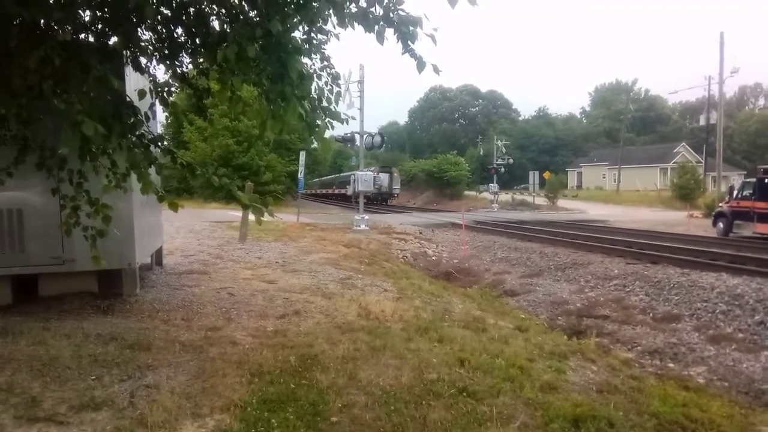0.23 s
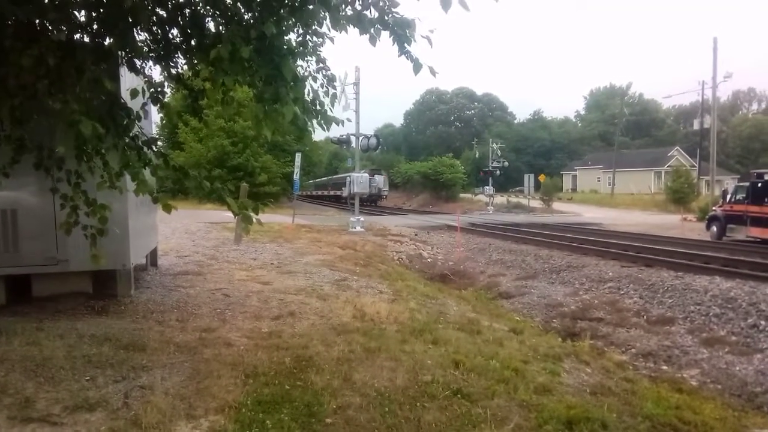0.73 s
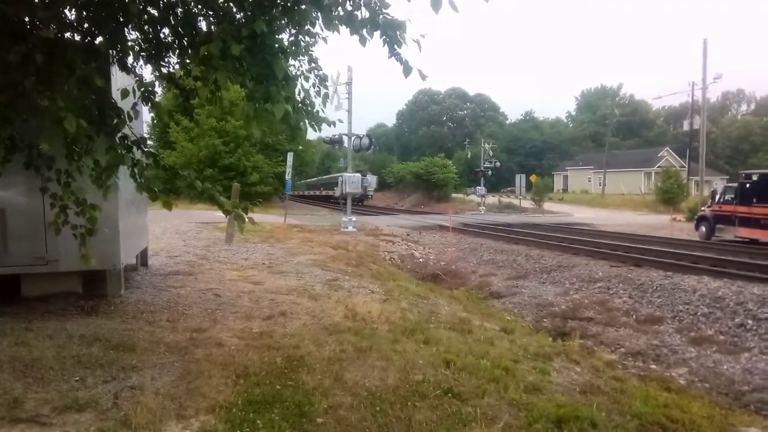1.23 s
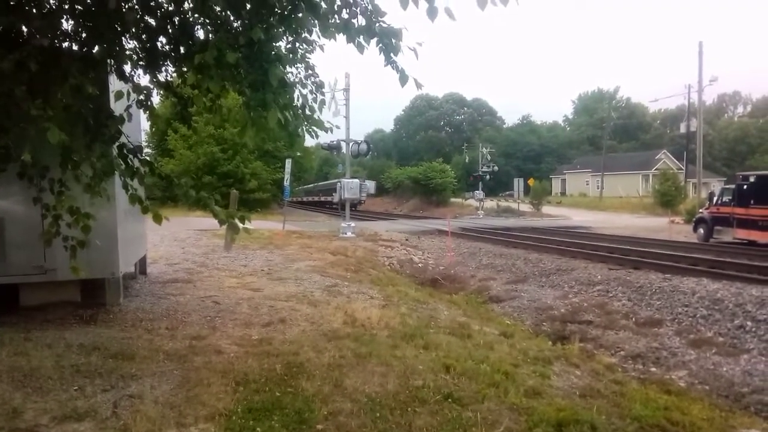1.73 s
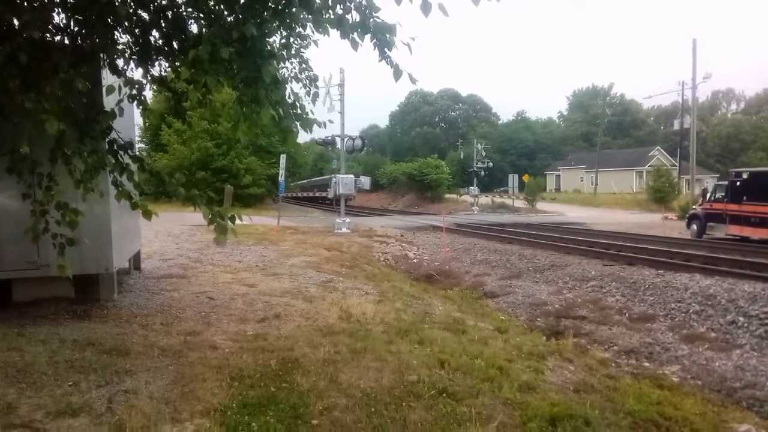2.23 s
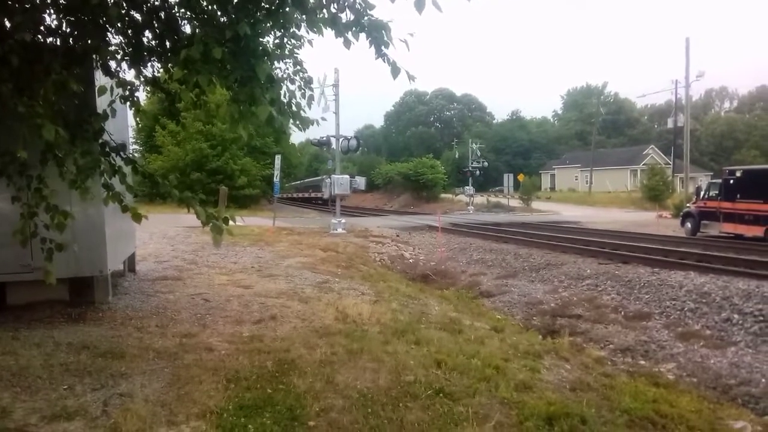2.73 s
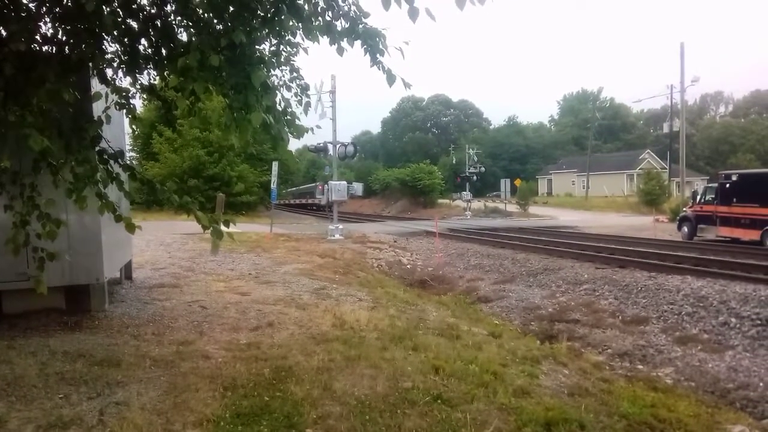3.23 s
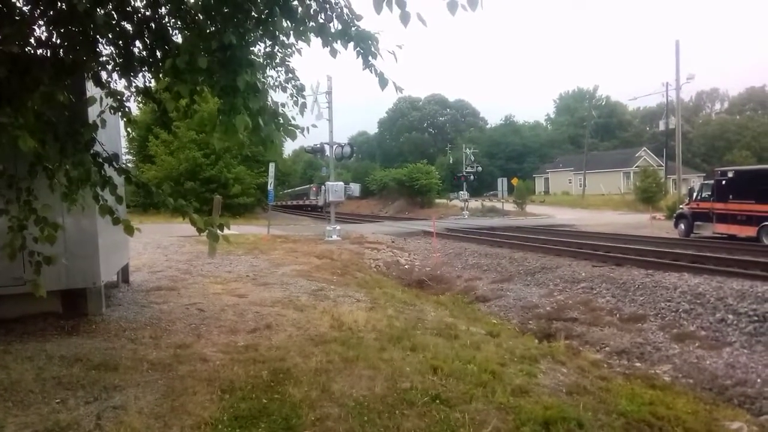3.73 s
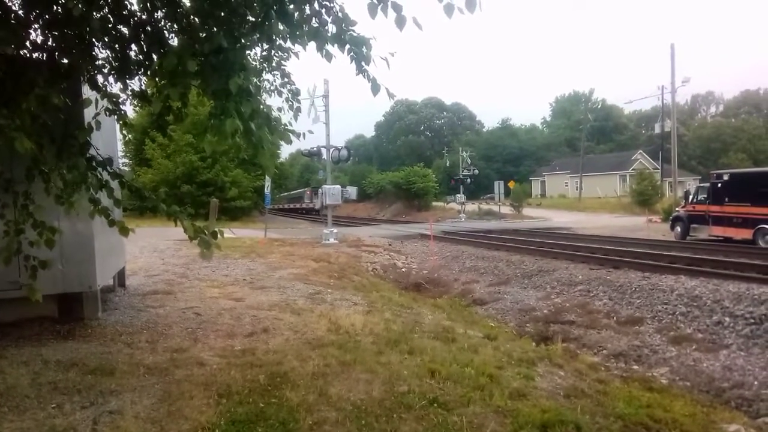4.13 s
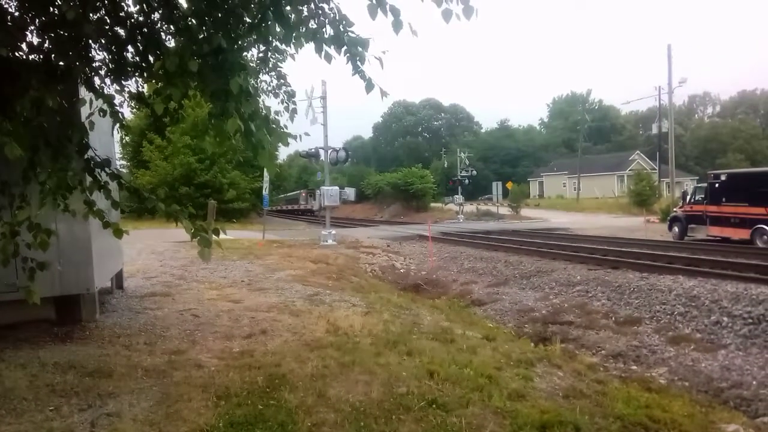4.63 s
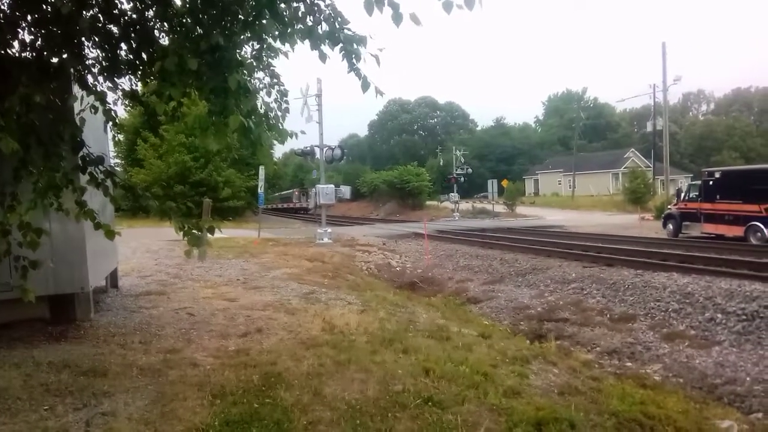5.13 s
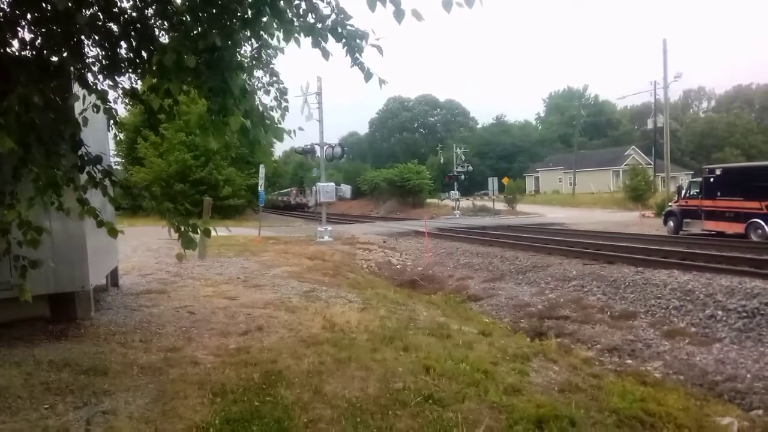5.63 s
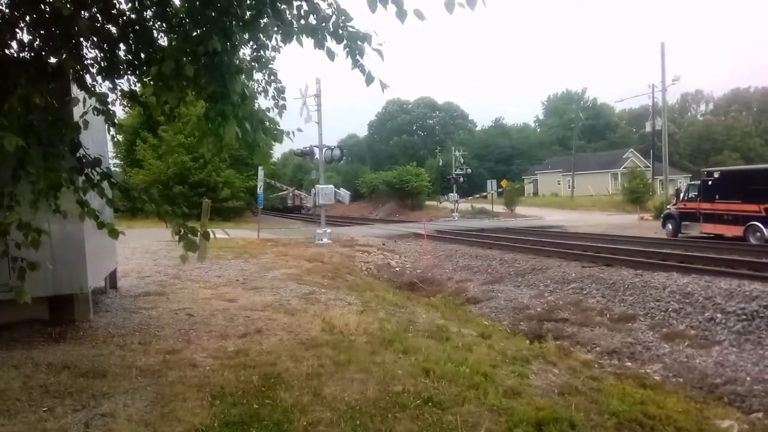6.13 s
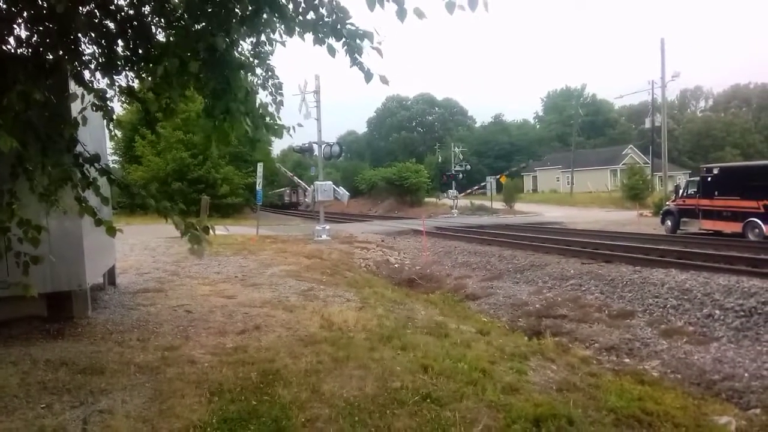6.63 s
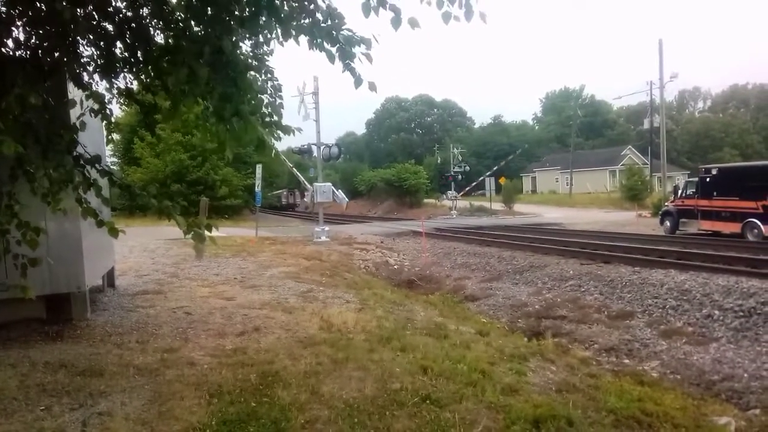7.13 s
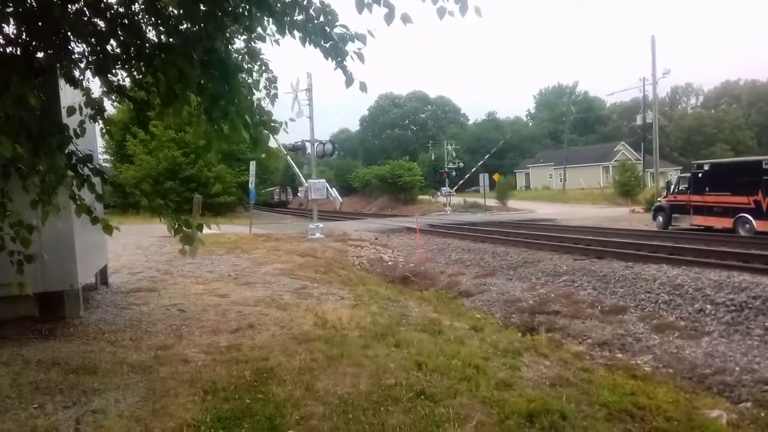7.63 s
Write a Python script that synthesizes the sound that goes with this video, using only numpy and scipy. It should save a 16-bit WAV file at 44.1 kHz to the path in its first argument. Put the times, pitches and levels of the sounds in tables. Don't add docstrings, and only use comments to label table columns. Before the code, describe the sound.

Open air beside a level crossing, mono, with slightly muffled treble. A low train and road rumble is strongest at the start and fades over the first few seconds, with a soft throbbing diesel idle and a faint rail whine. A prominent songbird whistles upward from about 2 to 3.2 kHz for some 0.15 seconds, ending in a tight snap that splits up and down, with a quick wall echo and leafy tail. Snaps fall near 0.3, 2.0, 3.5, 4.6 and 6.1 seconds. A sharp twig tick comes at 1.3, with softer ones later. From 5.2 to 5.45 loose metal clanks and rattles in rapid knocks. A faint high pip sounds at 5.9 and a thin level pipe at 6.4 to 6.8. The idle drops near 6.0; from 6.4 a truck pulls away, its tone rising until 7.7 amid swelling road hiss, then easing. A quick, loud chirp starts at 7.86.

```python
import sys
import numpy as np
from scipy import signal
from scipy.fft import rfft, irfft
from scipy.io import wavfile
from scipy.ndimage import uniform_filter1d

SR = 44100
rng = np.random.default_rng(int(sys.argv[2]) if len(sys.argv) > 2 else 0)


def rack_gain(trim_db):
    fader = np.asarray(trim_db, float)
    return 10 ** (fader / 20)


def digitize_waveform(pressure):
    field = np.atleast_2d(pressure).T
    bounded = np.clip(field, -1, 1)
    quanta = np.round(bounded * 32767).astype(np.int16)
    wavfile.write(sys.argv[1], SR, quanta)


N = 347508
T = np.arange(N) / SR

# frequency in Hz, density in dB per Hz.
AIR_COLOUR = [(48, -13), (62, -0.5), (300, -6.5), (500, -15.5), (830, -10.5), (1300, -18.5), (4800, -22.5),
              (7800, -41.5)]
# train at the start in dB, truck passing in dB.
TRAFFIC_SWELLS = [(.5, 3), (.8, 0.5), (3.8, 5.5)]
# multiple of the engine cycle, level in dB.
IDLE_HUM = [(8, -67.5), (9, -51), (10, -61), (11, -52), (13, -58.5), (14, -57), (15, -56.5), (20, -57.5),
            (23, -56), (36, -63.5)]
# time in seconds, main exhaust tone in Hz, level in dB.
TRUCK_PULL = [
    (6.4, 80, -60),
    (6.598, 99.47, -48),
    (6.75, 119.8, -44),
    (6.92, 160.9, -37.5),
    (7.05, 176, -44),
    (7.22, 187.1, -43.5),
    (7.45, 187.8, -42.5),
    (7.66, 188.2, -41.5),
    (7.88, 177.7, -46.5),
]
# multiple of the main exhaust tone, level in dB.
EXHAUST_ORDERS = [(1 / 3, -8), (2 / 3, -7), (5 / 6, -11.5), (1, -1), (4 / 3, -15)]
# time in seconds, level in dB, latch ring in dB, housing thud in dB,
# pitch of the latch part struck in Hz.
BARRIER_CLANKS = [
    (5.172, -29.5, -4, -22.5, 3300),
    (5.2044, -34.5, -3, -14, 2500),
    (5.2405, -38.5, 0.5, -17, 1800),
    (5.2674, -36, -5.5, -28.5, 2500),
    (5.330, -27.5, -8, -21, 1600),
    (5.3564, -35.5, -12, 1, 1600),
    (5.367, -30, -4, -1, 6450),
    (5.4355, -37, -5, -8, 6450),
    (5.4464, -35, -6.5, -4.5, 6450),
]
# frequency in Hz, level in dB, 60 dB decay in seconds.
LATCH_MODES = [(1597, -4, 0.05), (1800, 4.5, 0.047), (2500, -2.5, 0.13), (3300, 2.5, 0.024),
               (4300, -8, 0.038), (6450, -9.5, 0.11)]
HOUSING_MODES = [(653, 0, .12), (732, 0, 0.25), (824, 4, 0.098), (960, 3, 0.047)]
# time in seconds, level in dB, pitch in Hz, width in seconds.
TWIG_TICKS = [
    (1.3203, -24.5, 5680, 0.00045),
    (1.5175, -42, 5950, .0008),
    (3.70, -49, 7105, .001),
    (6.635, -44, 6660, .001),
    (6.8405, -41, 6450, 0.00065),
]
# time in seconds, pitch in Hz, level in dB.
PIPED_NOTES = [
    [(5.862, 6400, -65.5), (5.875, 6570, -46), (5.91, 6540, -57), (5.94, 6900, -57), (5.965, 6800, -73)],
    [(6.35, 4160, -61), (6.4, 4190, -52.5), (6.8, 4203, -55.5), (6.83, 4300, -62)],
]
# time in seconds, pitch in Hz, level in dB.
NEXT_CHIRP = [
    (7.861, 2500, -53),
    (7.867, 2960, -34),
    (7.871, 2340, -31.5),
    (7.876, 2840, -35.5),
    (7.881, 3160, -17.5),
]
# time of the snap in seconds, level in dB, top pitch in Hz, climb in Hz per ms,
# time before the snap where the climb levels off in seconds.
CALLS = [
    (.321, -24, 3251, 7.3, .026),
    (1.993, -24, 3259, 6.84, .032),
    (3.506, -20, 3096, 7.2, .05),
    (4.586, -22.5, 3197, 5.3, .016),
    (6.090, -23, 3217, 6.9, .02),
]
# time from the snap in seconds, pitch in Hz, level in dB.
SNAP_FLICK = [
    (.001, 3200, -10),
    (.003, 3730, 0.5),
    (.006, 4350, 1),
    (.009, 4546, -6),
    (.015, 4580, -21),
]
# time from the snap in seconds, pitch in Hz, level in dB.
SNAP_FALL = [
    (.004, 3170, -20),
    (.010, 3050, -4),
    (.022, 2800, -2),
    (.032, 2350, -4.5),
    (.040, 1960, -17),
    (.043, 1800, -39.5),
]
# delay in seconds, level in dB.
FAR_WALLS = [
    (0.0176, -14.5),
    (0.0273, -20),
    (.105, -35),
    (.192, -34.5),
    (.33, -33.5),
    (.486, -27.5),
]

AIR_DB, TRAIN_FADE_S, DRIFT_DB = -42, 1.84, 0.45
TRUCK_NEAREST_S, TRUCK_SPREAD_S = 7.4, 0.47
IDLE_HZ = 7.27
IDLE_ENDS_S, IDLE_DROP_DB = 6.02, -11
GEARS_DB, GEARS_LEAD_S = -53.5, 0.073
CARS_HZ, CARS_DB, CARS_DRIFT = 168.8, -56.5, .05
WHINE_HZ, WHINE_DB, WHINE_CLEAREST_S, WHINE_DB_PER_S = 1569, -57.5, 3.22, -1
STRUCK_DB_PER_OCTAVE = -5.5

RISE_S, SCOOP_HZ, SCOOP_S, SCOOP_BEND, SHOULDER_S, LOWEST_HZ = .15, 740, .022, 3.2, .01, 1850
SWELL_S, RAGGED_DB, WAVER_HZ = .037, 4, 5
EASY_HZ, BUZZ_FROM_HZ = 3180, 3050
VOICES_SUM_HZ = 7330
# value at the easy pitch, change per 100 Hz of top above it.
FADE_DB, SNAP_DB, BUZZ_DB, OVERTONE_DB, FALL_STRETCH = (0.9, 2), (2, 1.5), (-18, 6.5), (-26, 4.5), (0.95, -.03)

WALL_MS, WALL_DB, WALL_KNEE_HZ, WALL_LOSS_DB = 9.36, -1, 3060, -8
LEAVES_DB, LEAVES_T60_S, FIELD_DB, FIELD_T60_S = -5, 0.21, -16, 1.2
DUCK_TOP_DB, DUCK_RATIO, DUCK_S = -29, 3, .03


def band(x, hz, width):
    return signal.sosfilt(signal.butter(2, [hz - width / 2, hz + width / 2], "band", fs=SR, output="sos"), x)


def unit(x):
    return x / np.sqrt(np.mean(x ** 2))


def walk(rate):
    hold = int(SR / rate)
    steps = np.repeat(rng.standard_normal(N // hold + 1), hold)
    return unit(uniform_filter1d(uniform_filter1d(steps, hold), hold)[:N])


def cycle(hz):
    return 2 * np.pi * np.cumsum(hz) / SR


def tone(table, t=T, overtone_db=-56.5):
    s, hz, db = np.transpose(table)
    phase = cycle(np.interp(t, s, hz))
    edge = np.clip(np.minimum(t - s[0], s[-1] - t) / 0.00055, 0, 1)
    level = np.sqrt(2) * edge * rack_gain(np.interp(t, s, db))
    return level * (np.sin(phase) + rack_gain(overtone_db) * np.sin(2 * phase))


def ring(modes, size=8000):
    t = T[:size]
    return sum(rack_gain(db) * np.sin(2 * np.pi * hz * t) * rack_gain(-60 * t / t60) for hz, db, t60 in modes)


def add(out, sound, s):
    i = int(s * SR)
    out[i:i + len(sound)] += sound[:N - i]


def passing(lead_s=0):
    return np.exp(-.5 * ((T + lead_s - TRUCK_NEAREST_S) / TRUCK_SPREAD_S) ** 2)


def background():
    f = np.fft.rfftfreq(N, 1 / SR) + 1
    hz, db = np.transpose(AIR_COLOUR)
    colour = rfft(rng.standard_normal(N)) * rack_gain(np.interp(np.log(f), np.log(hz), db))
    colour /= np.sqrt(np.mean(irfft(colour, N) ** 2))
    train = np.exp(-T / TRAIN_FADE_S) - .3
    swells = np.array([train_db * train + truck_db * passing() + DRIFT_DB * walk(1.48)
                       for train_db, truck_db in TRAFFIC_SWELLS])
    out = 0
    for octave in np.arange(4, 14.1, .5):
        share = np.cos(np.pi * np.clip(np.log2(f) - octave, -.5, .5)) ** 2
        place = np.interp(octave, np.log2([200, 800, 2000]), [0, 1, 2])
        swell = np.clip(1 - abs(place - np.arange(3)), 0, 1) @ swells
        swell = swell * (1 + 1.1 * max(octave - 12.2, 0))
        out = out + rack_gain(swell + .8 * walk(8)) * irfft(colour * share, N)
    return rack_gain(AIR_DB) * out


def idling():
    hum = sum(rack_gain(db + 3.85 * walk(3)) * np.sin(2 * np.pi * k * IDLE_HZ * T + 0.66 * rng.standard_normal())
              for k, db in IDLE_HUM)
    return np.sqrt(2) * hum * rack_gain(IDLE_DROP_DB * np.clip((T - IDLE_ENDS_S) / 0.055, 0, 1))


def pulling_away():
    s, hz, db = np.transpose(TRUCK_PULL)
    phase = cycle(np.interp(T, s, hz) * (1 + 0.0057 * walk(6)))
    exhaust = sum(rack_gain(order_db + 1.6 * walk(9)) * np.sin(k * phase) for k, order_db in EXHAUST_ORDERS)
    gears = rack_gain(GEARS_DB + 2.0 * walk(11)) * passing(GEARS_LEAD_S)
    gears = gears * unit(band(rng.standard_normal(N), 2417, 180))
    return np.sqrt(2) * rack_gain(np.interp(T, s, db, left=-99)) * exhaust + gears


def cars_and_rail():
    cars = rack_gain(CARS_DB + 2.5 * walk(2.9)) * np.sin(cycle(CARS_HZ * (1 + CARS_DRIFT * walk(0.99))))
    whine_db = WHINE_DB + WHINE_DB_PER_S * abs(T - WHINE_CLEAREST_S) + 3.1 * walk(20)
    whine = rack_gain(whine_db) * np.sin(cycle(WHINE_HZ + 7.0 * walk(12)))
    return np.sqrt(2) * (cars + whine)


def barrier():
    out, t = np.zeros(N), T[:5000]
    for s, db, latch_db, thud_db, struck_hz in BARRIER_CLANKS:
        modes = np.array(LATCH_MODES) * (1 + [.02, .3, .3] * rng.uniform(-1, 1, (len(LATCH_MODES), 3)))
        modes[:, 1] += STRUCK_DB_PER_OCTAVE * abs(np.log2(modes[:, 0] / struck_hz))
        noise = rng.standard_normal((2, len(t)))
        scrape = noise[0] * rack_gain(-60 * t / 0.025)
        latch = unit(signal.fftconvolve(scrape, ring(modes))[:len(t)])
        thud = unit(signal.fftconvolve(scrape, ring(HOUSING_MODES))[:len(t)])
        spray = band(noise[1], 4200, 5600) * rack_gain(-60 * t / 0.18)
        clank = rack_gain(latch_db - 16.5) * latch + rack_gain(thud_db - 12.5) * thud + rack_gain(-5.0) * spray
        add(out, rack_gain(db) * clank, s)
    return out


def twigs():
    out, t = np.zeros(N), T[:5000]
    for s, db, hz, width in TWIG_TICKS:
        burst = np.exp(-.5 * (t / width - 4) ** 2)
        add(out, rack_gain(db) * burst * np.sin(2 * np.pi * hz * t), s - 4 * width)
    return out


def other_birds():
    return sum(tone(note) for note in PIPED_NOTES) * rack_gain(1.2 * walk(60)) + tone(NEXT_CHIRP)


def open_air():
    tail = T[:70000]
    space = sum(rack_gain(db - 60 * tail / t60) * np.sqrt(np.log(1e6) / (t60 * SR)) * rng.standard_normal(len(tail))
                for db, t60 in ((LEAVES_DB, LEAVES_T60_S), (FIELD_DB, FIELD_T60_S)))
    space = band(space, 3400, 4400) * np.clip(tail / .025, 0, 1)
    for s, db in FAR_WALLS:
        smear = (np.arange(4) == 0) + .35 * rng.standard_normal(4)
        space[int(s * SR) + int(s * 500) * np.arange(4)] += rack_gain(db) * smear / np.linalg.norm(smear)
    return space


def whistle(t, top, climb, shoulder):
    n = len(t)
    strain = (top - EASY_HZ) / 100
    strained = (FADE_DB, SNAP_DB, BUZZ_DB, OVERTONE_DB, FALL_STRETCH)
    fade_db, snap_db, buzz_db, overtone_db, fall_length = (a + b * strain for a, b in strained)
    rising = t < RISE_S

    below_top = 1000 * climb * SHOULDER_S * np.logaddexp(0, (RISE_S - shoulder - t) / SHOULDER_S)
    scoop = SCOOP_HZ * np.exp(-(t / SCOOP_S) ** SCOOP_BEND)
    hz = top - below_top - scoop + WAVER_HZ * walk(48.9)[:n]
    phase = cycle(hz)
    voiced = np.maximum(t - t[np.argmax(hz > LOWEST_HZ)], 0)
    effort = (1 - np.exp(-(voiced / SWELL_S) ** 1.01)) * rack_gain(fade_db * np.clip(t / RISE_S, 0, 1) ** 3)
    effort = effort * np.clip((RISE_S - t) / 0.0012 + .5, 0, 1)

    overtone_level = rack_gain(overtone_db + 3.3 * walk(250)[:n] + 3.5 * walk(50)[:n])
    overtone_level = overtone_level * np.clip(voiced / 0.0028, 0, 1) * rising
    second = np.sin(2 * phase + .7 * walk(500)[:n])
    third = rack_gain(-12.0) * effort * np.sin(3 * phase)
    overtones = overtone_level * (second + third)

    buzz_level = rack_gain(buzz_db) * rack_gain(np.minimum(4.5 * walk(900)[:n], 4.0))
    buzz_level = buzz_level * np.clip((hz - BUZZ_FROM_HZ) / 60, 0, 1) * rising
    buzz = buzz_level * np.sin(cycle(VOICES_SUM_HZ - hz + 230 * walk(800)[:n]))

    ragged = rack_gain(np.minimum(RAGGED_DB * walk(900)[:2 * n].reshape(2, -1), RAGGED_DB / 2))
    flick = ragged[0] * tone(SNAP_FLICK, t - RISE_S)
    fall = ragged[1] * tone(SNAP_FALL, (t - RISE_S) / fall_length, -34)
    low = effort * np.sin(phase) + rack_gain(snap_db - 5.0) * fall
    high = buzz + rack_gain(snap_db - 3.5) * flick
    return low + high + overtones + rack_gain(-9.0) * band(low * high, 6600, 1800)


def birds():
    near, dry, t = np.zeros(N), np.zeros(N), T[:12000]
    f = np.fft.rfftfreq(len(t), 1 / SR)
    scatter_db = WALL_LOSS_DB * np.clip((f - WALL_KNEE_HZ) / 120, 0, 1)
    small_db = -5 * np.clip((2700 - f) / 150, 0, 1)
    wall = rack_gain(WALL_DB + scatter_db + small_db) * np.exp(-2j * np.pi * f * WALL_MS / 1000)
    for snap, db, *shape in CALLS:
        call = rack_gain(db) * whistle(t, *shape)
        add(near, call + irfft(rfft(call) * wall, len(t)), snap - RISE_S)
        add(dry, call, snap - RISE_S)
    others = other_birds()
    return near + others + signal.fftconvolve(dry + rack_gain(-8.0) * others, open_air())[:N]


def scene():
    traffic = background() + idling() + pulling_away() + cars_and_rail()
    return np.array([traffic + barrier() + twigs() + birds()])


def low_pass(x):
    return signal.sosfilt(signal.butter(12, 7800, fs=SR, output="sos"), x)


def record(dry):
    k = int(DUCK_S * SR)
    loud = np.sqrt(uniform_filter1d(uniform_filter1d(dry ** 2, k), k) + 1e-12)
    gain = np.minimum(1, rack_gain(DUCK_TOP_DB) / loud) ** (1 - 1 / max(DUCK_RATIO, 1))
    floor = sum(signal.sosfiltfilt(signal.butter(3, edges_hz, "band", fs=SR, output="sos"), dry)
                for edges_hz in ([280, 2200], [4900, 19000]))
    cut = signal.sosfilt(signal.butter(10, 6700, fs=SR, output="sos"), dry - (1 - gain) * floor)
    cut = signal.sosfilt(signal.butter(2, 50, "high", fs=SR, output="sos"), cut)
    return low_pass(cut)


dry = scene()
out = record(dry)
digitize_waveform(out)
```